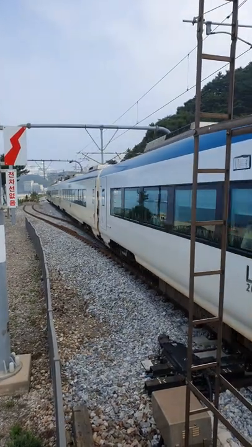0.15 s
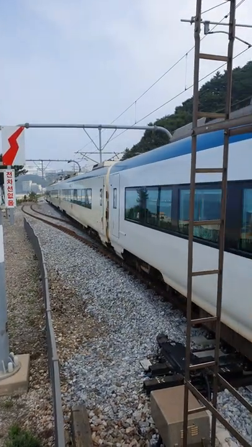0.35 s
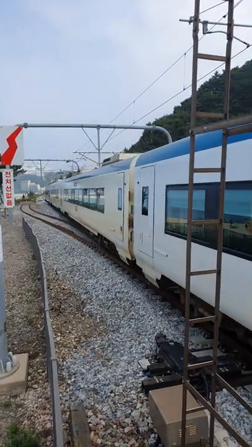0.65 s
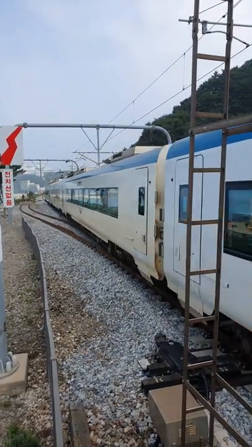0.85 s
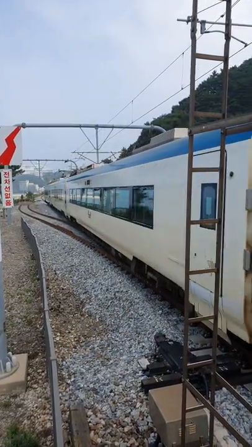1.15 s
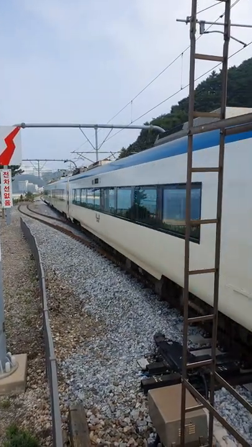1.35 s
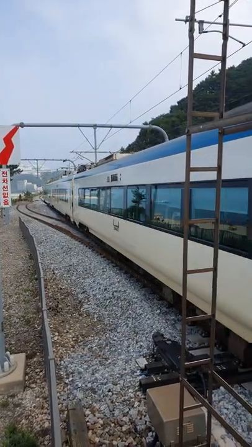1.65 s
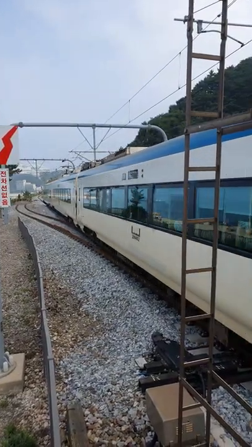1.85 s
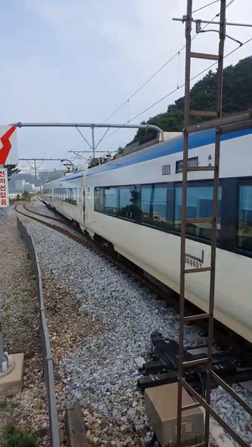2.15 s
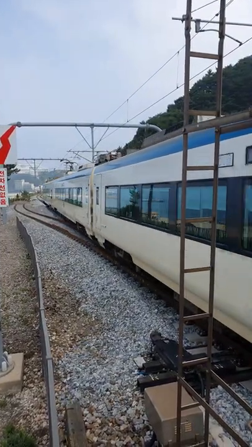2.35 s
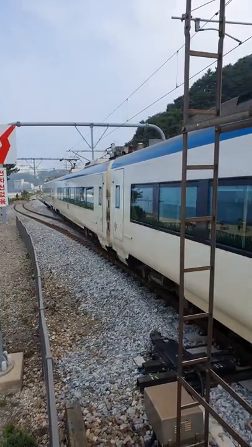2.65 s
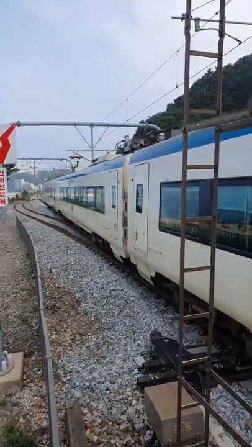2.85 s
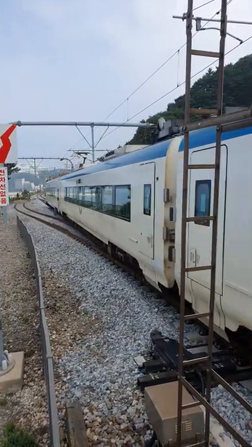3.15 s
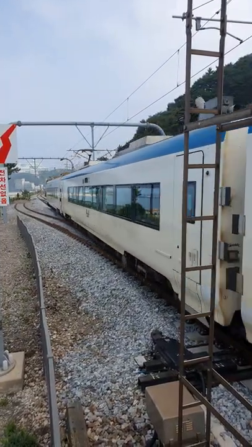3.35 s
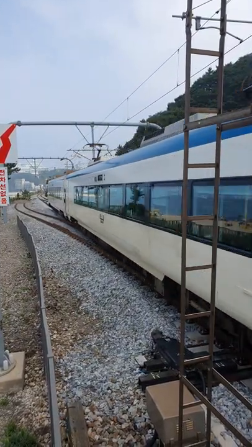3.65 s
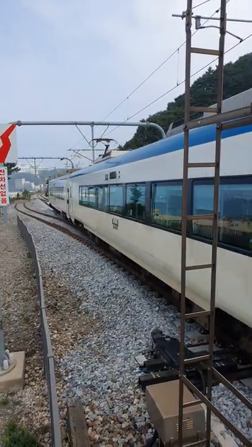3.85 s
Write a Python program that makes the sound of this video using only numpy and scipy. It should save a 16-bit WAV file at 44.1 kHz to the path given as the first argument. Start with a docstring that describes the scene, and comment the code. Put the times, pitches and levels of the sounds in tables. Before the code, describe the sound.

A passenger train rolls slowly past close by, wheels thudding over rail joints with sharp metallic clanks

```python
"""Slow train over points

A passenger train rolls slowly over points beside a two-port microphone.
Roughness of wheel and rail is patchy noise in six bands; each axle over a gap is a jolt exciting rail modes.
Now and then a flange strikes and scrapes (decaying noise), and wheel modes ring on in the treble.
"""
import sys
import numpy as np
from scipy import signal
from scipy.fft import rfft, irfft
from scipy.io import wavfile
from scipy.ndimage import uniform_filter1d

SR = 44100
rng = np.random.default_rng(int(sys.argv[2]) if len(sys.argv) > 2 else 0)


def to_wav(s):
    """Save 16-bit WAV."""
    ch = np.atleast_2d(s).T  # columns
    pcm = np.round(np.clip(ch, -1, 1) * 32767)  # PCM
    wavfile.write(sys.argv[1], SR, pcm.astype(np.int16))


def to_linear_factor(level_db):
    """Convert decibel levels (scalar or array-like) to linear amplitude factors."""
    exponent = np.asarray(level_db, float) / 20
    return 10 ** exponent


N = 176400

# All levels are those ahead of the ports; spectra are relative, each sound being scaled afterwards.
# Rolling levels: t/s, then level/dB of ground rumble, low rail roar, upper rail roar, mid rolling,
# rush, contact hiss, wheel singing
ROLLING_LEVELS = [(0.0, -34.5, -39, -35.5, -38, -44, -51, -53),
                  (0.3, -35, -38.5, -39.5, -40.5, -48, -51, -61),
                  (0.5, -36.5, -34.5, -32.5, -38, -48, -53, -61),
                  (0.63, -33, -35.5, -27, -37.5, -47.5, -47, -56),
                  (0.76, -30, -24, -25.5, -34, -39.5, -42, -58),
                  (0.91, -27.5, -25, -19, -29.5, -37.5, -39, -57),
                  (1.06, -20.5, -23, -26, -25.5, -29, -33, -53),
                  (1.17, -22, -18, -24.5, -28.5, -31, -35, -61),
                  (1.36, -22, -22.5, -21, -28, -32.5, -35.5, -56),
                  (1.49, -23, -18, -21.5, -27, -34.5, -38.5, -50),
                  (1.67, -26, -21, -24.5, -32.5, -40, -36, -36.5),
                  (1.88, -27, -25.5, -27.5, -31, -40.5, -37.5, -42.5),
                  (2.16, -26, -30, -33, -34.5, -44.5, -43.5, -40.5),
                  (2.44, -28.5, -35.5, -37.5, -36.5, -44.5, -45.5, -49.5),
                  (2.66, -30.5, -27.5, -27.5, -37.5, -47, -47.5, -50),
                  (2.81, -27, -22, -23.5, -32, -45, -41.5, -42.5),
                  (3.02, -22.5, -19, -20.5, -32, -37.5, -44.5, -36),
                  (3.21, -29, -23, -25.5, -34, -48, -33, -40),
                  (3.43, -27, -19.5, -30.5, -38, -39, -36.5, -56),
                  (3.63, -28, -25.5, -24, -32.5, -43.5, -42, -41),
                  (3.85, -24.5, -19.5, -33.5, -35.5, -40, -47, -41),
                  (4.0, -25, -28.5, -24, -32.5, -40, -39, -49)]
# Ground rumble spectrum: f/Hz, density/dB per Hz
RUMBLE_SPECTRUM = [(22, -20), (32, -10), (45, 13), (62, 12.5), (82, 17.5), (100, 15), (128, 3.5),
                   (165, -35)]
# Low rail roar spectrum: f/Hz, density/dB per Hz
LOW_ROAR_SPECTRUM = [(71, -26.5), (120, -9.5), (162, -4), (210, 6.5), (258, -12.5), (323, 1), (380, -7.5),
                     (490, -80), (840, -120)]
# Upper rail roar spectrum: f/Hz, density/dB per Hz
UPPER_ROAR_SPECTRUM = [(220, -24.5), (370, -12.5), (393, -12), (414, -24), (448, -4), (497, 1), (524, -5),
                       (566, -3.5), (702, -17.5), (850, -29.5), (1100, -62), (1870, -120)]
# Mid rolling spectrum: f/Hz, density/dB per Hz
MID_SPECTRUM = [(600, -16), (780, -1.5), (1050, -5.5), (1300, -1), (1550, -7), (1850, -8), (2100, -6),
                (2450, -17.5), (2900, -60)]
# Broad rush spectrum: f/Hz, density/dB per Hz
RUSH_SPECTRUM = [(1440, -45), (2450, -6.5), (3200, -2.5), (4250, -9.5), (5520, -58), (9350, -120)]
# Contact hiss spectrum: f/Hz, density/dB per Hz
HISS_SPECTRUM = [(2440, -21), (4150, -1), (4370, 4), (4780, 0), (5440, 2.5), (5910, -3.5), (6430, -1),
                 (6810, -3.5), (8190, -26), (9970, -29), (11700, -11), (15900, -55)]
# Axles over gaps: t/s, blow level/dB, then peak level/dB of sleeper boom, thud, knock, clank
AXLE_BLOWS = [(0.238, -13, -9, -10, -5.5, -23), (0.457, -11.5, -6, -5.5, -7, -14),
              (0.652, -20.5, -16, -28, 2.5, -14), (0.886, -14, -18, 2.5, -7.5, -15),
              (0.914, -5, -8.5, -1, -6, -23), (1.106, 0, -11, -9, -8, -27),
              (1.129, -3.5, -16, -0.5, -4.5, -21), (1.237, -12.5, -13, -11, -4.5, -37),
              (1.341, -5, -10.5, -31, 3.5, -19), (1.56, -8, -11.5, 0, -1, -15),
              (1.611, -0.5, -8.5, -6.5, -10.5, -20.5), (1.813, -8, -9, -10.5, -5, -8),
              (1.844, 1, -18, -13, -19, -22.5), (1.905, -0.5, -7, -8, -8.5, -25),
              (2.045, -8, -15, -16, 0, -13.5), (2.384, -9, -2, -1, -8, -17.5),
              (2.599, -17, -11, -22, 0, -25), (2.624, -6.5, -2.5, -6.5, -6.5, -13.5),
              (2.878, -18, -20, -6, 1, -19), (3.131, -1.5, -8.5, -8.5, -8.5, -12),
              (3.349, -8.5, -15, -4, -10, -10.5), (3.383, -6, -10, -10.5, -5, -14),
              (3.508, -14.5, -25, -8, -7.5, -12), (3.598, -6, -12.5, -9.5, -5.5, -16),
              (3.839, -11, -1, -13, -3.5, -21), (3.898, -4.5, -9, -5, -8.5, -15),
              (3.958, -1.5, -17, -10, -25, -23)]
# Modes of rail and sleepers: f/Hz, level/dB, t60/s
RAIL_MODES = [(145, -8.5, 0.28), (165, 3.5, 0.26), (196, 3.5, 0.2), (242.5, -1.5, 0.044),
              (287.6, 3.5, 0.081), (328, -0.5, 0.086), (412.5, -3.5, 0.21), (477.3, -2, 0.14),
              (587, 2, 0.065), (669.4, -2, 0.074), (762, -5, 0.11), (918, 4, 0.071), (1018, 3.5, 0.053),
              (1300, -3, 0.03), (1546, -5.5, 0.058), (1720, -43, 0.038), (2073, -7.5, 0.22)]
# Edges of the four groups of rail modes: f/Hz
RAIL_GROUP_EDGES = (0, 215, 370, 760, 3000)
# Flange strikes: t/s, scrape level/dB, scrape tilt/dB per octave, scrape t60/s, low ring level/dB,
# high ring level/dB
FLANGE_STRIKES = [(0.9797, -27.5, 2.5, 0.19, -57, -52), (1.109, -28, -4, 0.072, -54, -47),
                  (1.5952, -28, 1, 0.097, -58, -24), (1.604, -18.5, 1.5, 0.06, -36.5, -46),
                  (3.0205, -18, 0.5, 0.16, -26, -23.5), (3.063, -11.5, 3.5, 0.25, -31, -23.5),
                  (3.096, -19.5, 1.5, 0.16, -33.5, -36), (3.1213, -7, 11, 0.069, -47, -21)]
# Spectrum of steel scraping or ticking on steel: f/Hz, density/dB per Hz
SCRAPE_SPECTRUM = [(1290, -56), (2200, -20), (2470, -43), (2550, -3.5), (3250, 2.5), (4030, 0), (4300, 3.5),
                   (5250, 3), (6090, -7.5), (6670, 2.5), (8070, -26), (8480, -30), (9210, -12),
                   (10700, -10.5), (14400, -17), (15900, -9.5)]
# Wheel modes after a strike, each the centre of a cluster: f/Hz, level/dB, t60/s
WHEEL_MODES = [(2780, -9, 0.42), (3290, -3, 0.25), (3550, -2.5, 1.2), (4395, 2, 0.96), (4780, -7.5, 1.8),
               (5410, 5, 0.75), (5440, -24, 0.32), (6110, -8, 0.98), (5980, -1, .6), (6750, -11, 0.88),
               (7120, -7.5, 1.7)]
# Dense treble modes, one list for each of the two struck wheels: f/Hz, density/dB per Hz
SHIMMER_SPECTRA = [
    [(4820, -53), (8200, -28), (8690, -11), (9310, -11), (10100, -16), (10500, -9), (11300, -9),
     (12100, -4), (12600, 0), (13500, -2), (14200, 0), (14900, 1.5), (15900, -10)],
    [(4820, -34), (8200, -37), (8380, 5), (8840, 10), (9010, -17), (9290, -15), (9850, -3), (10300, -5),
     (10500, 4.5), (11200, 3), (12100, 8.5), (13100, 4), (14400, 5), (14800, 1), (15900, -6)],
]
# Bands of crowded modes in the shimmer, one list for each wheel: f/Hz, width/Hz, level/dB
SHIMMER_BANDS = [
    [(11300, 250, 2), (12100, 300, 6), (12900, 250, 1), (13800, 250, 1), (14400, 300, 4), (15400, 250, 5)],
    [(10300, 200, 3), (10700, 200, 6.5), (11960, 200, 6), (12300, 200, -3), (13000, 250, -1),
     (14200, 250, 6.5), (14600, 200, 6), (15400, 200, 4)],
]
# Decay of the shimmer: f/Hz, t60/s
SHIMMER_DECAY = [(9500, 1.12), (12000, 1.17), (14000, 1.1), (16000, 1.1)]
# Wheel modes kept sounding while rolling: f/Hz, level/dB
SINGING_MODES = [(2780, 1.5), (3540, 3), (4410, 1.5), (4780, -6), (5350, -5), (6230, -3.5)]
# Likeness of the ports once the delay is taken out: f/Hz, likeness (limited to 0..1 in use)
PORT_LIKENESS = [(60, 1), (300, 1.3), (700, 1.05), (1400, 0.54), (3000, 0.5), (6000, -0.24), (16000, -0.2)]
# Balance of the ports: f/Hz, left minus right level/dB
PORT_BALANCE = [(60, 0.3), (400, 0.4), (800, -.5), (1300, -3), (1900, -2.5), (2500, 3.5), (3400, -0.5),
                (4500, -6.5), (6500, -5), (9000, 2.5), (11000, -9), (15000, -2)]


def thump(s, blow_db, *group_db):
    """Impact excitation: a short rough jolt rings each group of rail modes, topped by a tick and wheel modes."""
    jolt_s, jolt_cut_hz = 0.0076, 120
    detune, uneven_db = 0.03, 2.5  # spread of mode pitch (as a share) and level from blow to blow
    tick_db, tick_t60 = -36, 0.12  # steel on steel
    wake_db, wake_t60 = -36, 0.28  # the jolt sets the singing modes ringing
    t = np.arange(SR // 3) / SR
    jolt = rng.standard_normal((2, len(t))) * t / jolt_s * np.exp(-t / jolt_s)
    jolt = signal.lfilter(*signal.butter(2, jolt_cut_hz, "high", fs=SR), jolt)
    body = 0
    spot = rng.standard_normal((len(RAIL_MODES), 2))  # each blow lands on another spot
    for part_db, low, high in zip(group_db, RAIL_GROUP_EDGES, RAIL_GROUP_EDGES[1:]):
        modes = 0
        for (hz, db, t60), (u, v) in zip(RAIL_MODES, spot):
            if low <= hz < high:
                decay = to_linear_factor(db + uneven_db * u - 60 * t / t60)
                modes = modes + decay * np.sin(2 * np.pi * hz * (1 + detune * v) * t)
        part = signal.fftconvolve(jolt, modes[None], axes=1)[:, :len(t)]
        body = body + to_linear_factor(part_db) * part / np.abs(part).max(1, keepdims=True)
    tick = evened(coloured(rng.standard_normal((2, len(t))), SCRAPE_SPECTRUM))
    tick = tick * to_linear_factor(tick_db - 60 * t / tick_t60)
    wake = sung(len(t)) * to_linear_factor(wake_db - 60 * t / wake_t60) * (1 - t / t[-1])
    onset = np.minimum(t / 0.0046, 1)
    return s, to_linear_factor(blow_db) * (body + (tick + wake) * onset)


def flange(s, scrape_db, tilt_db, scrape_t60, low_db, high_db):
    """Friction and free vibration: a burst of scraping, then wheel modes and a dense shimmer dying away."""
    second_wheel_s, swell_s = 2.5, 0.0015  # strikes after this time ring the second wheel; ring build-up
    t = np.arange(SR) / SR
    scrape = evened(coloured(rng.standard_normal((2, SR)), SCRAPE_SPECTRUM, tilt_db))
    scrape = scrape * to_linear_factor(scrape_db - 60 * t / scrape_t60)
    low_ring = mode_clusters()
    low_ring = low_ring / np.sqrt(np.mean(low_ring[:, :4000] ** 2))
    ring = to_linear_factor(low_db) * low_ring + to_linear_factor(high_db) * shimmer(int(s > second_wheel_s))
    swell = 1 - np.exp(-t / swell_s)
    fade = np.minimum(10 - 10 * t, 1)
    return s, scrape * np.minimum(t / 0.00041, 1) + ring * swell * fade


def mode_clusters():
    """Modal superposition: close damped resonances about each wheel mode beat together for 1 s."""
    count, spread = 5, 0.008  # modes in a cluster; spread as a share of pitch
    f = np.fft.rfftfreq(SR, 1 / SR)
    ring = np.zeros((2, SR // 2 + 1), complex)
    for hz, db, t60 in WHEEL_MODES:
        off, size, phase, phase2 = rng.standard_normal((count, 4)).T[..., None]
        damping = np.log(1000) / t60
        pole = to_linear_factor(db + 2 * size) / (damping + 2j * np.pi * (f - hz * (1 + spread * off)))
        ring += [(np.exp(9j * p) * pole).sum(0) for p in (phase, phase2)]
    return irfft(ring, SR)


def shimmer(wheel):
    """High modal density: crowded treble modes act as noise whose decay depends on frequency."""
    f = np.fft.rfftfreq(SR, 1 / SR)
    bands_db = sum(db / (1 + (2 * (f - hz) / width) ** 2) for hz, width, db in SHIMMER_BANDS[wheel])
    dense = irfft(rfft(rng.standard_normal((2, SR))) * to_linear_factor(bands_db), SR)
    dense = evened(coloured(dense, SHIMMER_SPECTRA[wheel]))
    hz, at, z = signal.stft(dense, SR, nperseg=256)
    decay = to_linear_factor(-60 * at / read(SHIMMER_DECAY, hz)[:, None])
    return signal.istft(z * decay, SR, nperseg=256)[1][:, :SR]


def rolling():
    """Roughness excitation: rough wheels shake rail and ground, heard as six bands of noise."""
    mix = rolling_layer(RUMBLE_SPECTRUM, column=1, size=2048, flicker_db=-0.2, patchy_db=1.5)
    mix += rolling_layer(LOW_ROAR_SPECTRUM, column=2, size=1024, flicker_db=2.0)
    mix += rolling_layer(UPPER_ROAR_SPECTRUM, column=3, size=1024, flicker_db=1.0, patchy_db=2.5)
    mix += rolling_layer(MID_SPECTRUM, column=4, size=512, flicker_db=-0.5)
    mix += rolling_layer(RUSH_SPECTRUM, column=5, size=512, flicker_db=0.35)
    mix += rolling_layer(HISS_SPECTRUM, column=6, size=512, flicker_db=1.3)
    return mix


def rolling_layer(points, column, size, flicker_db, patchy_db=2.0):
    """Random excitation: two unrelated draws of patchy, flickering noise share one level curve."""
    frames, hz = N * 4 // size + 5, np.fft.rfftfreq(size, 1 / SR)
    a, b, c, d, patches = rng.standard_normal((frames, len(hz), 5)).T
    patches = evened(uniform_filter1d(uniform_filter1d(patches, 5, 0), 9, 1))  # over frequency, then time
    flicker = evened(uniform_filter1d(rng.standard_normal(frames), 4))
    gain = to_linear_factor(read(points, hz)[:, None] + patchy_db * patches + flicker_db * flicker)
    z = np.array([a + 1j * b, c + 1j * d]) * gain
    noise = signal.istft(z, nperseg=size, noverlap=size * 3 // 4)[1][:, :N]
    return level(column) * evened(noise)


def singing():
    """Sustained resonance: rolling roughness keeps the lower wheel modes faintly sounding."""
    return level(column=7) * sung(N)


def sung(size):
    """Resonant filtering: noise passes twice through a peak at each lower wheel mode."""
    sharpness = 25.5  # Q of one pass
    out = np.zeros((2, size))
    for hz, db in SINGING_MODES:
        b, a = signal.iirpeak(hz, sharpness, SR)
        once = signal.lfilter(b, a, rng.standard_normal((2, size)))
        out += to_linear_factor(db) * evened(signal.lfilter(b, a, once))
    return evened(out)


def level(column):
    """Envelope: gain over time, linear in dB between the rows of one rolling column."""
    rows = np.array(ROLLING_LEVELS)
    return to_linear_factor(np.interp(np.arange(N) / SR, rows[:, 0], rows[:, column]))


def read(points, hz):
    """Interpolation: the value of a table on a log-frequency axis."""
    f, value = np.transpose(points)
    return np.interp(np.log(hz + 1), np.log(f + 1), value)


def coloured(x, points, tilt_db=0):
    """Linear filtering: shapes x by a spectrum table and a tilt in dB per octave about 7 kHz."""
    hz = np.fft.rfftfreq(x.shape[-1], 1 / SR)
    gain = to_linear_factor(read(points, hz) + tilt_db * np.log2((hz + 1) / 7000))
    return irfft(rfft(x) * gain, x.shape[-1])


def evened(x):
    """Normalisation: scales to rms 1."""
    return x / np.sqrt(np.mean(x ** 2) + 1e-20)


def add(mix, s, sound):
    """Superposition: mixes a sound in at time s."""
    part = mix[..., round(s * SR):][..., :sound.shape[-1]]
    part += sound[..., :part.shape[-1]]


def ports(mix, pan_db=0):
    """Partial coherence: blends two draws into the spectra of two ports, the left delayed."""
    left_late_s = 0.00025
    hz, (a, b) = np.fft.rfftfreq(N, 1 / SR), rfft(mix)
    same = np.clip(read(PORT_LIKENESS, hz), 0, 1)
    side_db = read(PORT_BALANCE, hz) + pan_db
    left = a * np.exp(-2j * np.pi * hz * left_late_s) * to_linear_factor(side_db / 2)
    right = (same * a + np.sqrt(1 - same ** 2) * b) * to_linear_factor(-side_db / 2)
    return np.array([left, right])


def scene():
    """Superposition: thumps, flange strikes, rolling and singing meet at the two ports."""
    mix = rolling() + singing()
    strikes = np.zeros((2, N))
    for row in AXLE_BLOWS:
        add(mix, *thump(*row))
    for row in FLANGE_STRIKES:
        add(strikes, *flange(*row))
    # the flange is further to the right than the rolling
    return irfft(ports(mix) + ports(strikes, pan_db=-3.5), N)


def top_cut(x):
    """Nothing passes above the cut-off."""
    return signal.sosfilt(signal.butter(12, 16470, fs=SR, output="sos"), x)


def record(dry):
    """Band limiting and saturation: the microphone's low cut, upper edge and soft overload."""
    low_cut_hz, edge_hz, ceiling = 45, 15760, 0.96  # ceiling as a share of full scale
    hz = np.fft.rfftfreq(N, 1 / SR)
    band = (hz < edge_hz) * hz ** 3 / (hz ** 3 + low_cut_hz ** 3)
    x = irfft(rfft(dry) * band, N) / ceiling
    mix = ceiling * x / (1 + x ** 8) ** (1 / 8)
    return top_cut(mix)


dry = scene()
out = record(dry)
to_wav(out)
```